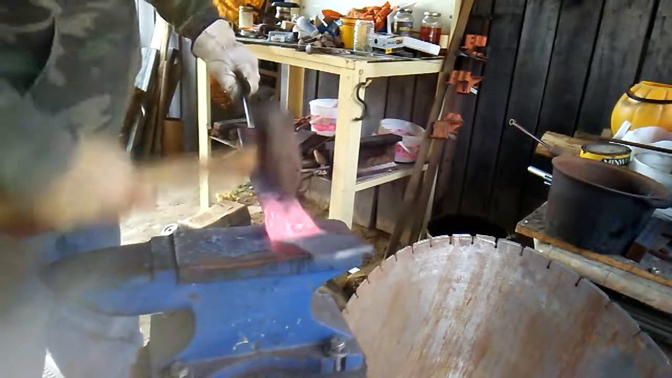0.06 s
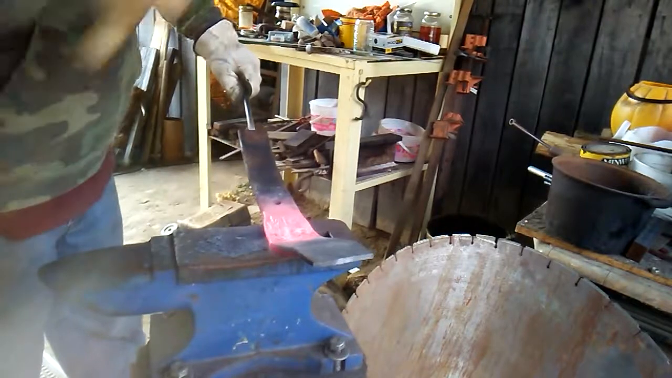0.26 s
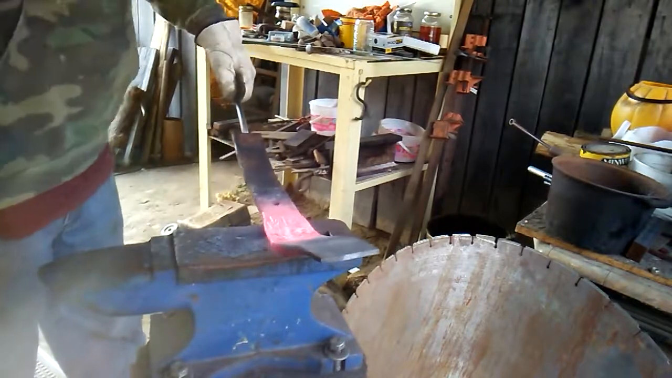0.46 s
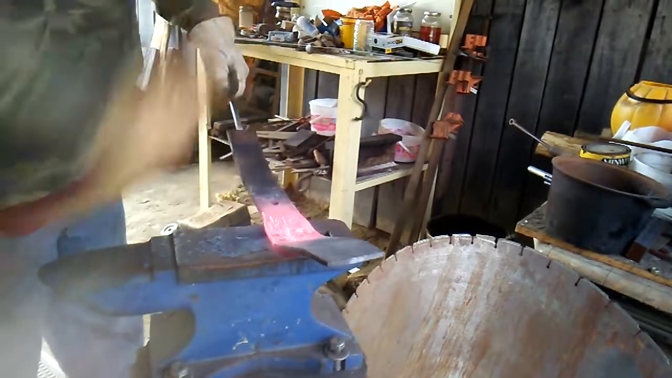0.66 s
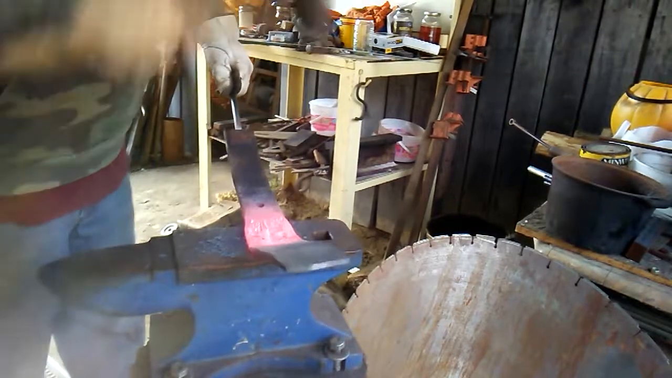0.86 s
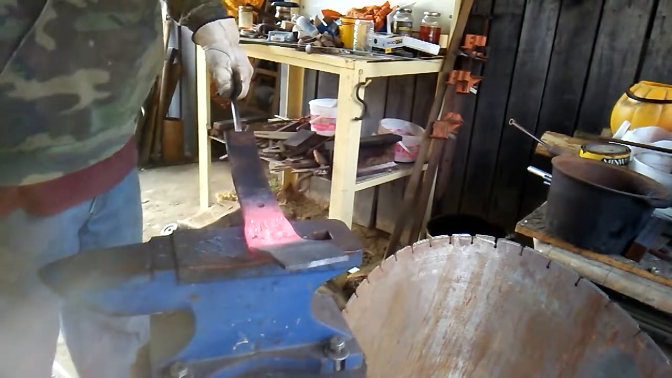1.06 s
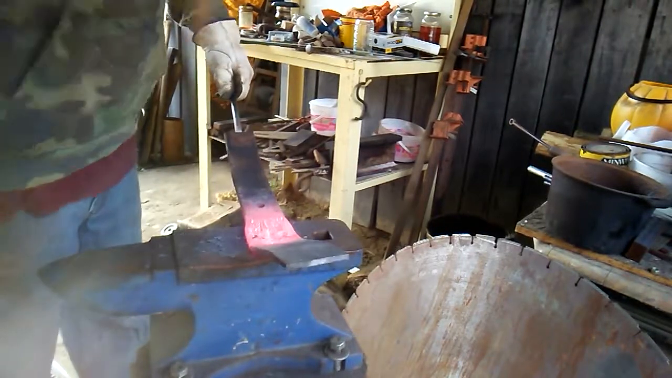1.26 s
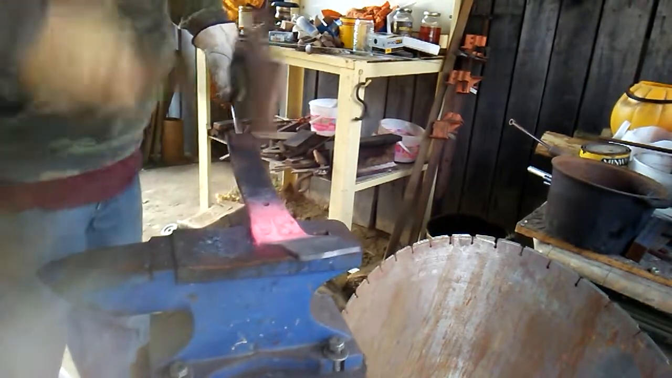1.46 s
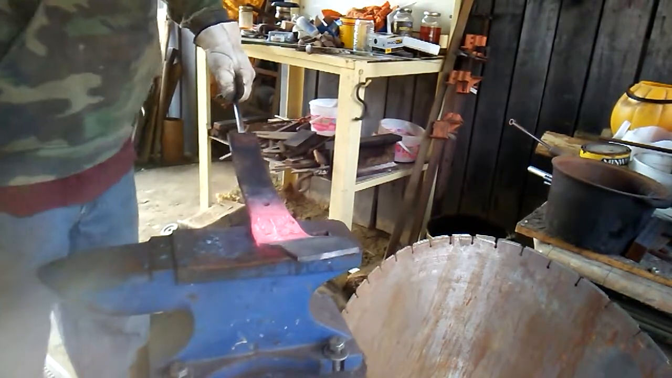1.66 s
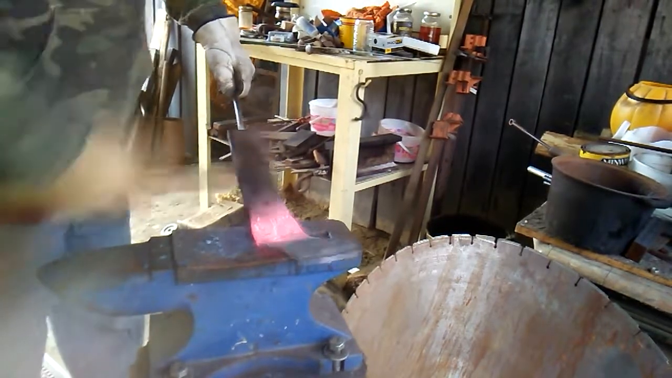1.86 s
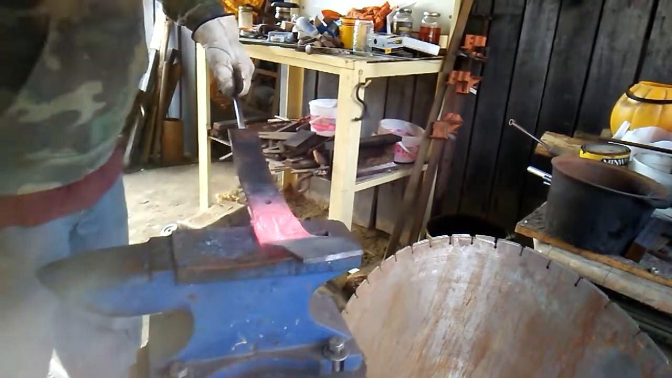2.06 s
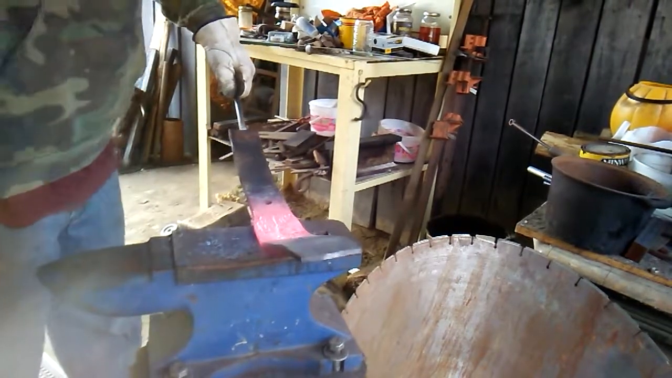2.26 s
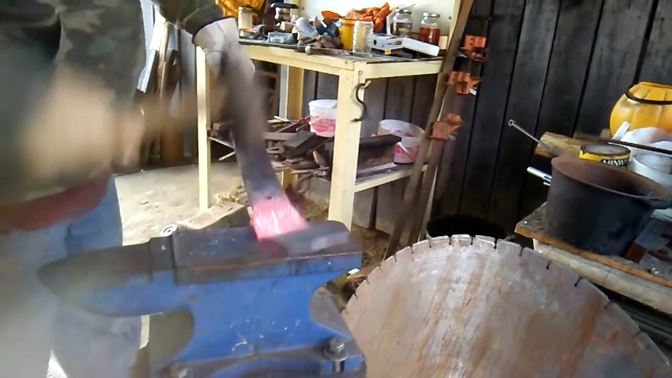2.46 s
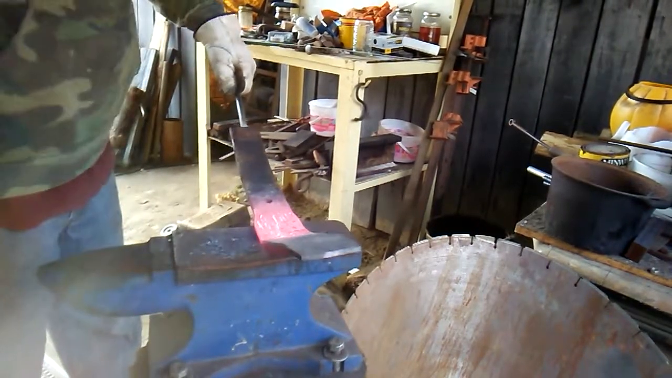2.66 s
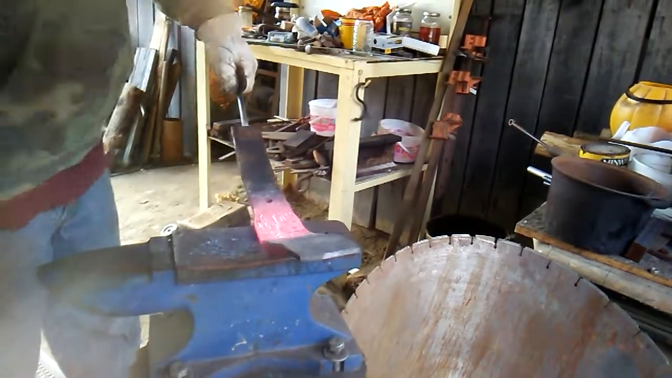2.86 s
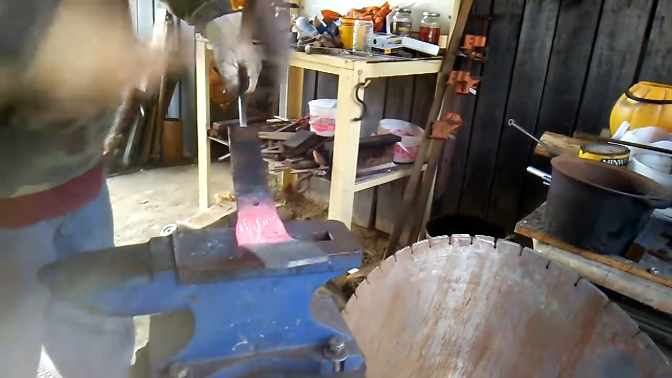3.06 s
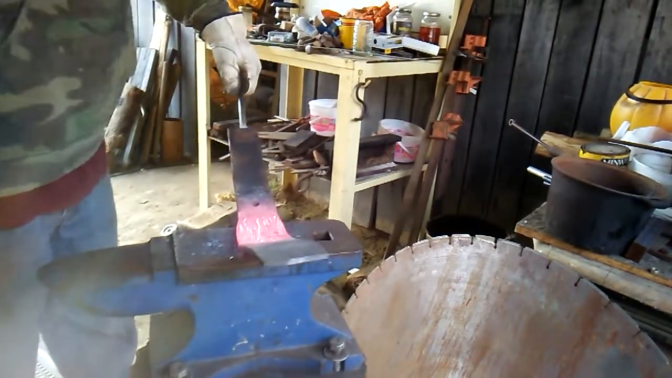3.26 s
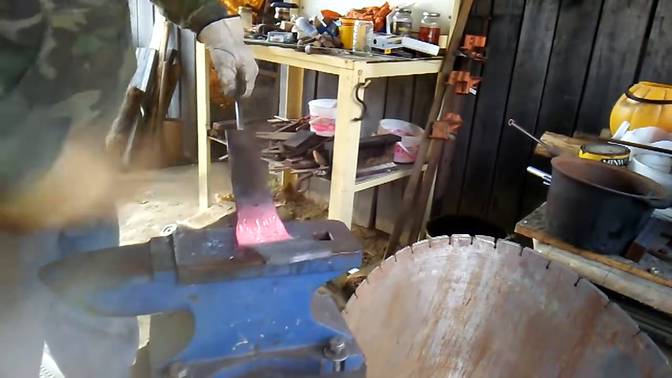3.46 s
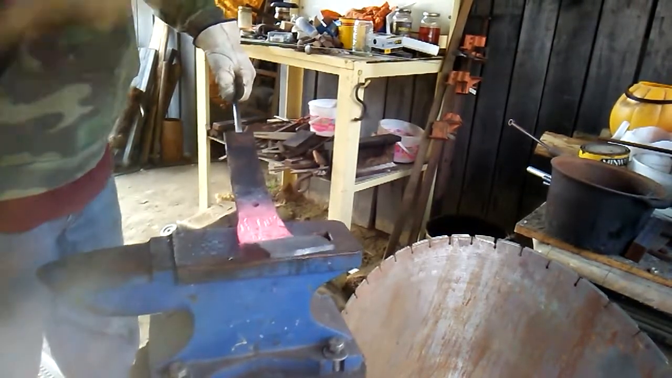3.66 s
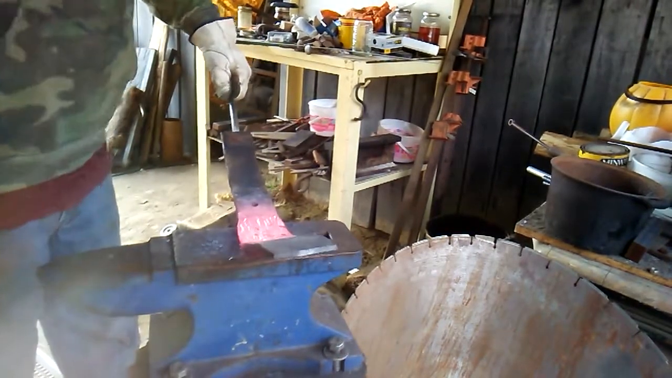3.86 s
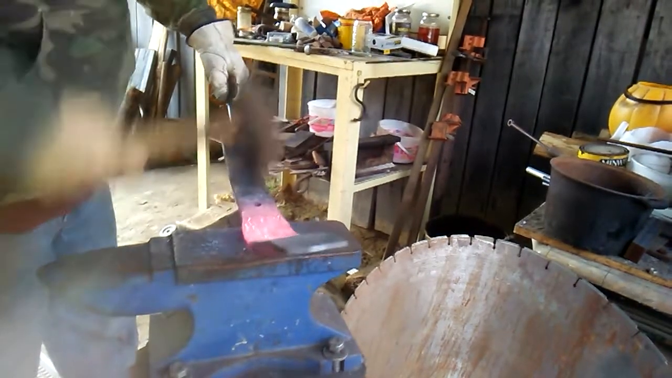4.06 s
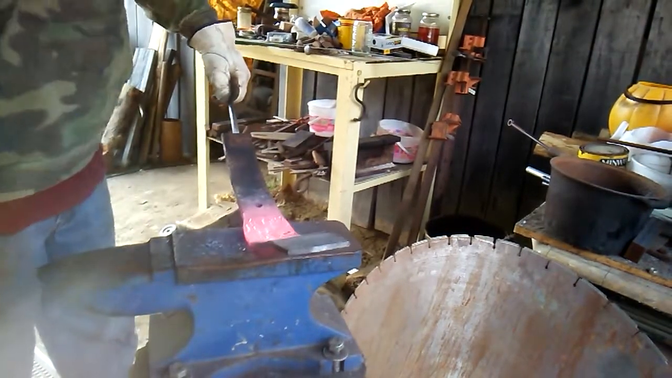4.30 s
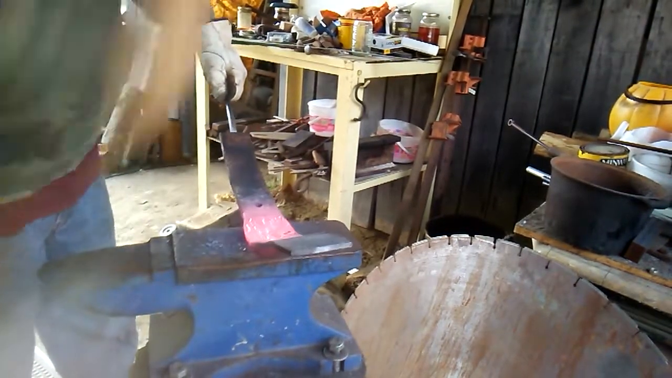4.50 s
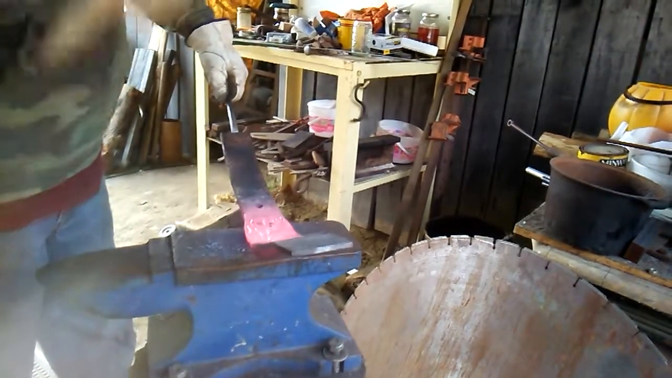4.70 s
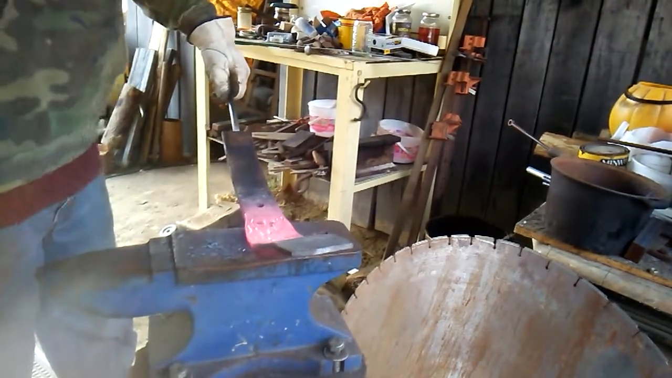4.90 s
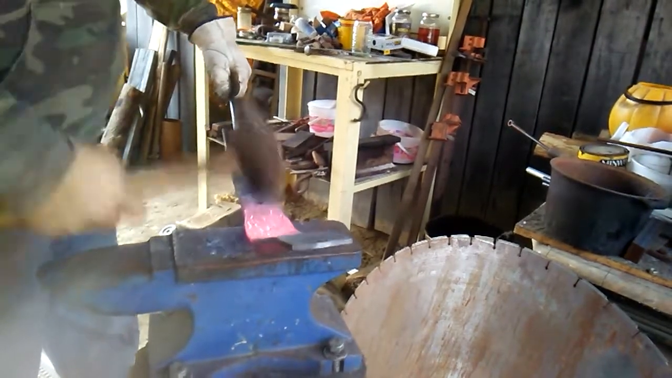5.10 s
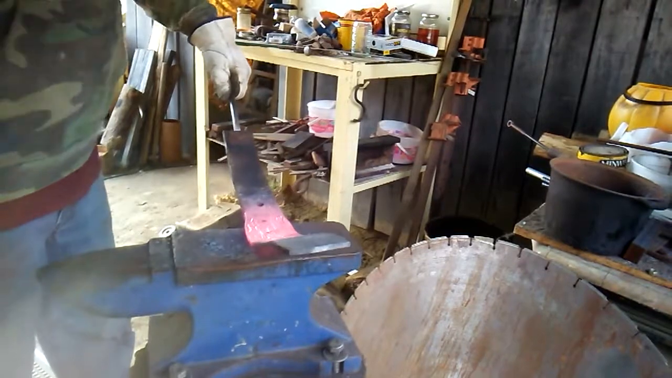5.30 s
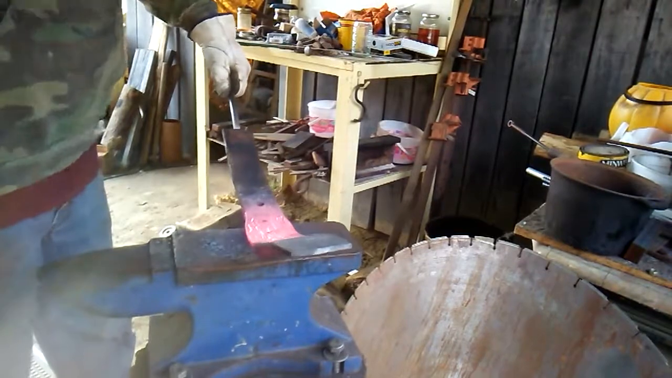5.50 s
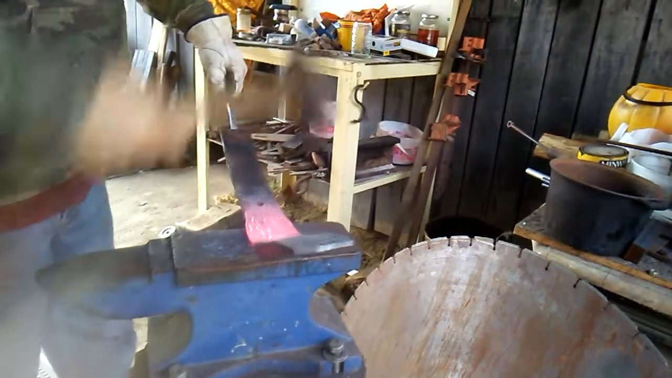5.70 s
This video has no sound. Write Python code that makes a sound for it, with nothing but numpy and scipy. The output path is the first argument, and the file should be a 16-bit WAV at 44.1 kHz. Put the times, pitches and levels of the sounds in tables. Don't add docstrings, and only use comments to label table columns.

```python
import sys
import numpy as np
from scipy import signal
from scipy.io import wavfile
from scipy.ndimage import uniform_filter1d

SR = 44100
rng = np.random.default_rng(int(sys.argv[2]) if len(sys.argv) > 2 else 0)


def makeup_ratio(level_db):
    decades = np.asarray(level_db, float) / 20
    return 10 ** decades


def generate_wav(sig):
    pcm = np.round(np.clip(np.atleast_2d(sig).T, -1, 1) * 32767).astype(np.int16)
    wavfile.write(sys.argv[1], SR, pcm)


N = 253134


def evened(x):
    return x / np.sqrt(np.mean(x ** 2) + 1e-20)


def read(points, hz):
    f, value = np.transpose(points)
    return np.interp(np.log(hz + 1), np.log(f + 1), value)


def add(mix, start_s, sound):
    part = mix[round(start_s * SR):][:len(sound)]
    part += sound[:len(part)]


def resonate(x, hz, width_hz):
    turn = np.exp(2j * np.pi * hz * np.arange(len(x)) / SR)
    r = np.exp(-np.pi * width_hz / SR)
    return 2 * (turn * signal.lfilter([1 - r], [1, -r], x / turn)).real


def drift(per_s, count):
    steps = rng.standard_normal((count, int(N / SR * 50) + 2))
    span = max(int(25 / per_s), 1)
    smooth = uniform_filter1d(uniform_filter1d(steps, span), span)
    return np.array([np.interp(np.arange(N) * 50 / SR, np.arange(len(c)), evened(c)) for c in smooth])


def noise(shape_db, count, size, patchy_db, patch_frames=8):
    hz = np.fft.rfftfreq(size, 1 / SR)[:, None]
    s = np.arange(count * 4 // size + 3) * size / 4 / SR
    a, b, patches = rng.standard_normal((len(s), len(hz), 3)).T
    patches = evened(uniform_filter1d(uniform_filter1d(patches, 3, axis=0), patch_frames, axis=1))
    z = (a + 1j * b) * makeup_ratio(shape_db(hz, s) + patchy_db * patches)
    return signal.istft(z, nperseg=size, noverlap=size * 3 // 4)[1][:count] / size


def steady(points, count, size, patchy_db):
    return evened(noise(lambda hz, s: read(points, hz) + 0 * s, count, size, patchy_db))


# (start_s, strength_db, tilt_db_per_octave, crash_damping_factor, shed_tail_db)
BLOWS = [(0.148, 0, -1.4, 0.87, -2.8), (0.825, 1.5, 0, 0.99, -3), (1.465, 4.5, 1.2, 0.96, 0),
         (1.995, 5.5, 0.1, 1, -0.1), (2.515, 5, -0.55, 0.95, -0.4), (3.062, 4.5, -0.5, 1, -1.7),
         (3.596, 4.5, -0.26, 1.03, -0.2), (4.133, 5.5, 1.5, 1, 0.8), (4.671, 4, 0.5, 0.89, 2.5),
         (5.197, 4, 1.46, 0.89, 2.5)]
# (along -1..1, across -1..1, slant -1..1, thud_db)
LANDING = [(1, 0.13, -0.78, 2), (0.83, -0.0079, 0.38, 3), (0.079, -1.0, -0.02, -2),
           (0.14, -0.04, -1.02, -3.5), (-0.44, 0.0, -0.52, -1.7), (0.048, 1.0, 0.04, 0.5),
           (-0.84, -0.36, 0.35, -1.5), (-0.48, -0.29, 0.21, -1.5), (-0.58, -0.11, 0.32, -2.2),
           (-0.42, 0.18, -0.32, -1.5)]
# (lowest_db, lower_pair_db, upper_pair_db, faint_pair_db, t60_factor)
HORN_LEVELS = [(-54, -45.5, -34, -67.5, 1.06), (-72.5, -39.5, -49, -65, 1.13),
               (-43.5, -43.5, -61, -48.5, 0.95), (-47, -59, -68.5, -58, 0.56), (-34, -44, -53, -64, 0.92),
               (-50, -39, -51, -60, 0.75), (-44.5, -53.5, -57.5, -59, 0.56), (-37, -35, -58.5, -63.5, 1.25),
               (-44.5, -50, -50, -65, 1.5), (-52, -62.5, -47, -60, 0.74)]


def hammering(mix):
    for (start_s, *how), (*landing, thud_db), levels in zip(BLOWS, LANDING, HORN_LEVELS):
        add(mix, start_s, blow(*how, landing, thud_db))
        add(mix, start_s, horn(*levels))


# (freq_hz, level_db_per_hz)
CRASH = [(100, -33.5), (400, -7.5), (900, -1), (1600, -2), (2500, -0.5), (3000, -2), (4500, -0.5),
         (7000, 1), (9000, -1), (11000, -10.5), (13000, -7), (16000, -10.5)]
# (freq_hz, t60_s)
CRASH_T60 = [(200, 0.28), (1000, 0.19), (4000, 0.2), (8000, 0.18), (11000, 0.16), (13000, 0.079),
             (16000, .07)]
# (freq_hz, level_db_per_hz)
SHED = [(200, -38.5), (1000, -28.5), (3600, -26), (4200, -30), (5100, -46.5), (6800, -31), (9500, -38),
        (12000, -46), (16000, -63)]
# (freq_hz, t60_s)
SHED_T60 = [(300, .6), (3000, 0.6), (5000, 0.54), (8000, 0.64), (14000, 0.44)]
# (freq_hz, width_hz, level_db)
STUMP = [
    (39.5, 20, -21),
    (304, 82, -1.3),
    (612, 25, -2.5),
    (864, 59, -3.5),
]


def blow(strength_db, tilt_db, damping, tail_db, landing, thud_db):
    t = np.arange(int(.6 * SR)) / SR

    def crash_db(hz, s):
        tilt = tilt_db * np.log2(hz / 3000 + 0.017)
        return read(CRASH, hz) + tilt - 60 * s * damping / read(CRASH_T60, hz)

    def shed_db(hz, s):
        return read(SHED, hz) + tail_db - 60 * s / read(SHED_T60, hz)

    crash = noise(crash_db, len(t), size=512, patchy_db=2.5, patch_frames=12)
    tail = noise(shed_db, len(t), size=256, patchy_db=0.5)
    knocks = rng.standard_normal(len(t)) * makeup_ratio(-60 * t / 0.26)
    thud = sum(makeup_ratio(db) * resonate(knocks, hz, width_hz) for hz, width_hz, db in STUMP)
    sound = makeup_ratio(39.5) * (crash + tail) + makeup_ratio(21.5) * rings(t, landing) + makeup_ratio(thud_db + 11) * thud
    onset = np.minimum(t / 0.00019, 1)
    fade = np.minimum((t[-1] - t) / .1, 1)
    return makeup_ratio(strength_db) * sound * onset * fade


ANVIL_HZ = [1846, 1908, 1968, 2458, 3570, 3780, 4310, 4525, 5545, 6510, 6750, 6962]
# (level_db, t60_s, change_along_db, change_across_db, change_slant_db)
ANVIL = [(-24.5, 0.27, 3.7, -2, 1), (-29.5, 0.31, -0.5, 1.5, 3), (-24, 0.24, -3, 0.6, 1.5),
         (-25.5, 0.31, -4, 5, 0), (-24.5, 0.24, -5, -0.7, -7.5), (-32, 0.29, -10.5, 3.5, -1.5),
         (-27, 0.2, -13.5, 4.5, -1), (-22.5, 0.16, -2, -2.5, 1.5), (-27, 0.23, 2, -3.0, 10.5),
         (-30.5, 0.15, -4.5, -10, -2.5), (-29, 0.18, -1.7, -16, 1.5), (-29.5, 0.27, -7.5, -2, 4)]


def rings(t, landing):
    db, t60_s, *change_db = np.transpose(ANVIL)[:, :, None]
    t60_s = np.minimum(t60_s, .2)
    db = db + np.tensordot(landing, change_db, axes=1) - 60 * t / t60_s
    shake = makeup_ratio(-4) * flutter(t, rough=.8, step_s=.007, count=len(ANVIL))
    return (makeup_ratio(db) * shake * np.exp(2j * np.pi * np.outer(ANVIL_HZ, t))).real.sum(0)


def flutter(t, rough, step_s, count):
    a, b = rng.standard_normal((2, count, 120))
    shake = np.array([np.interp(t, np.arange(120) * step_s, c) for c in a + 1j * b])
    return (1 - rough + rough * shake) * np.exp(2j * np.pi * rng.random((count, 1)))


HORN_HZ = [8790, 10660, 10870, 10970, 12790]
HORN_T60 = [0.38, .42, 0.34, 0.25, 0.4]


def horn(low_db, lower_db, upper_db, faint_db, t60_factor):
    bloom_s, settle_s, top_mode_db = 0.065, .2, -13
    t = np.arange(int(.6 * SR)) / SR
    t60_s = t60_factor * np.array(HORN_T60)[:, None]
    start_db = np.array([low_db, faint_db, lower_db, upper_db, faint_db + top_mode_db])[:, None]
    db = start_db + 3 - 60 * (t - .16) / t60_s
    rough = .12 + .5 * np.exp(-t / settle_s)
    shake = flutter(t, rough, step_s=.012, count=len(HORN_HZ))
    swell = 1 - np.exp(-(t / bloom_s) ** 2)
    return swell * (makeup_ratio(db) * shake * np.exp(2j * np.pi * np.outer(HORN_HZ, t))).real.sum(0)


# (start_s, level_db, pitch_hz)
REBOUNDS = [
    (.254, -35, 11000),
    (0.921, -22.5, 2380),
]


def rebounds(mix):
    t = np.arange(900) / SR
    for start_s, db, hz in REBOUNDS:
        tap = rng.standard_normal(len(t))
        for _ in range(2):
            tap = resonate(tap, hz, 0.44 * hz)
        add(mix, start_s, makeup_ratio(db) * evened(tap) * 3 * np.exp(-t / 0.0037))


# (freq_hz, level_db_per_hz)
HISS = [(4200, -27), (5200, -26), (6200, -7.5), (8300, -0.3), (10000, -10.5), (12000, -15.5),
        (15500, -26.5)]
# (start_s, length_s, level_db)
SWISHES = [
    (.455, .02, -60),
    (.68, 0.16, -57),
    (1.3, 0.035, -65),
    (1.36, .04, -63),
    (4.091, 0.054, -47),
    (5.715, 0.044, -60),
]


def swishes(mix):
    for start_s, length_s, db in SWISHES:
        cloth = steady(HISS, int(length_s * SR), size=256, patchy_db=-0.5)
        add(mix, start_s, makeup_ratio(db) * cloth * signal.windows.tukey(len(cloth), .3))


# (shaft_multiple, level_db, waver_db)
ORDERS = [(3, -23, 3.5), (5, -19.5, -1), (7, -10, 4), (9, -12, 4.5), (10, -14, 4.5), (11, -13, 3.5),
          (12, -15.5, 2.5), (14, -28, 4.5), (15, -16, 2.5), (16, -9, 1.5), (19, -15.5, 3.5), (20, -15.5, 2),
          (22, -21, 5.5)]


def motor():
    shaft_hz, slip_hz = 30.01, 1.124
    t = np.arange(N) / SR
    turns = np.cumsum(shaft_hz * (1 + .001 * drift(2.5, count=1)[0])) / SR
    multiple, db, waver_db = np.transpose(ORDERS)[:, :, None]
    phase = rng.random((len(ORDERS), 1))
    level_db = -33.5 + db + waver_db * drift(4.2, count=len(ORDERS))
    orders = (makeup_ratio(level_db) * np.sin(2 * np.pi * (multiple * turns + phase))).sum(0)
    eighth = makeup_ratio(-33) * (throb(t, slip_hz) * np.exp(2j * np.pi * 8 * turns)).imag
    whine_db = -57.5 + 8 * np.cos(2 * np.pi * slip_hz * (t - .65))
    whine = evened(resonate(rng.standard_normal(N), hz=1644, width_hz=45))
    return orders + eighth + makeup_ratio(whine_db) * whine


# (slip_multiple, level_db, sign_at_null)
SIDE_TONES = [(-1, -9, -1), (-2, -5.5, -1), (-3, -23.5, 1)]


def throb(t, slip_hz):
    null_s = 0.29
    multiple, db, sign = np.transpose(SIDE_TONES)[:, :, None]
    slip = multiple * slip_hz * (t - null_s)
    return 1 + (sign * makeup_ratio(db) * np.exp(2j * np.pi * slip)).sum(0)


# (freq_hz, level_db_per_hz)
ROAR = [(30, -55), (70, -10), (100, -25), (110, -49), (134, -49), (148, -4.5), (300, -6.5), (600, -5),
        (750, -9), (1700, -18), (3100, -22), (4000, -22.5), (4400, -68.5), (6000, -83)]
# (time_s, hiss_db)
AIR = [(0, -56), (.1, -64.5), (.55, -66), (.8, -63.5), (1.28, -69.5), (1.45, -63), (1.9, -64), (2.4, -68),
       (2.95, -64.5), (3.5, -61), (4.05, -69), (4.6, -61), (5.1, -61), (5.74, -62.5)]


def wash():
    t = np.arange(N) / SR
    roar_db = -39.5 + 13 * stirred(t)
    hiss_db = np.interp(t, *np.transpose(AIR)) + 11 * stirred(t)
    roar = steady(ROAR, N, size=4096, patchy_db=1.9)
    hiss = steady(HISS, N, size=512, patchy_db=0.5)
    return makeup_ratio(roar_db) * roar + makeup_ratio(hiss_db) * hiss


def stirred(t):
    stir_s = 0.11
    since_s = t - np.array(BLOWS)[:, :1]
    return np.where(since_s > 0, np.exp(-abs(since_s) / stir_s), 0).max(0)


def scene():
    mix = motor() + wash()
    hammering(mix)
    rebounds(mix)
    swishes(mix)
    return mix[None]


def limit(dry):
    power_db = 10 * np.log10(abs(uniform_filter1d(dry[0] ** 2, 90)) + 1e-12)
    fall_db = np.arange(N) * 1100.0 / SR
    over_db = np.maximum(np.maximum.accumulate(power_db + fall_db) - fall_db + 9.0, 0)
    held = dry / makeup_ratio(0.73 * uniform_filter1d(over_db, 40))
    knee = 5.1
    return 1.091 * held / (1 + abs(held) ** knee) ** (1 / knee)


def starve(x):
    from_hz, under_db, loud_frame_db = 12900, 41, -27
    hz, _, z = signal.stft(x, SR, nperseg=1024)
    power = abs(z) ** 2
    band = np.add.reduceat(power, np.arange(0, len(hz), 16), axis=1)
    band = np.repeat(band, 16, axis=1)[:, :len(hz)]
    total = power.sum(1, keepdims=True)
    weak = (band * makeup_ratio(2 * under_db) < total) & (total > makeup_ratio(2 * loud_frame_db))
    kept = z * ~(weak & (hz[:, None] > from_hz))
    return signal.istft(kept, SR, nperseg=1024)[1][:, :N]


def top_cut(x):
    return signal.sosfilt(signal.butter(12, 16470, fs=SR, output="sos"), x)


def record(dry):
    bass_cut = signal.butter(1, 50, "high", fs=SR, output="sos")
    band_limit = signal.ellip(10, .3, 70, 15720, fs=SR, output="sos")
    heard = signal.sosfilt(bass_cut, limit(dry))
    self_noise = makeup_ratio(-72.5) * np.diff(rng.standard_normal(N + 2), 2)
    limited = signal.sosfilt(band_limit, heard + self_noise)
    finished = np.clip(starve(limited), -1, 1)
    return top_cut(finished)


dry = scene()
out = record(dry)
generate_wav(out)
```